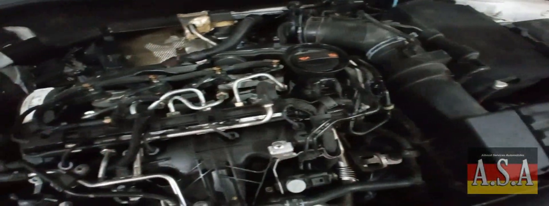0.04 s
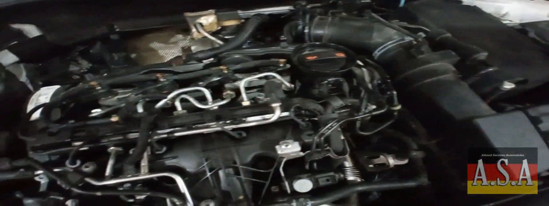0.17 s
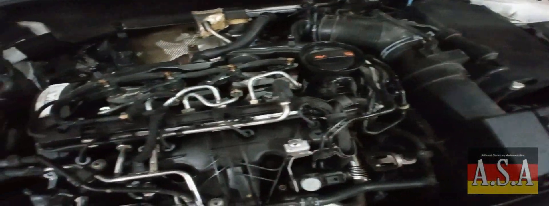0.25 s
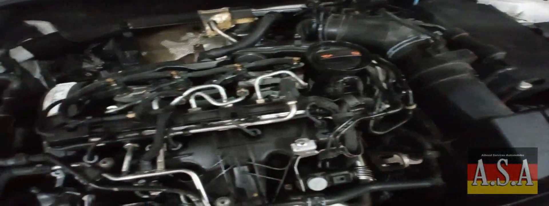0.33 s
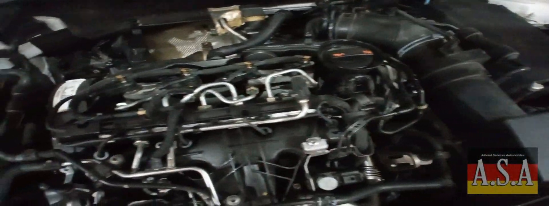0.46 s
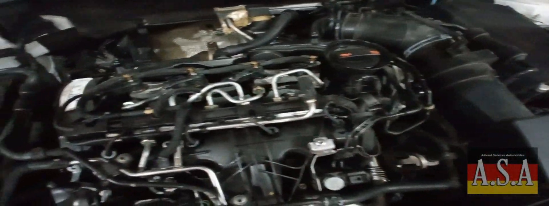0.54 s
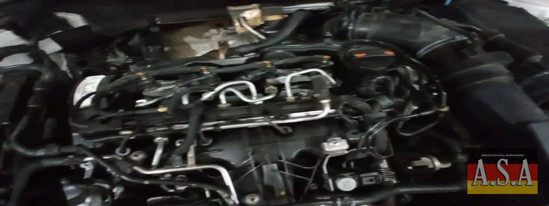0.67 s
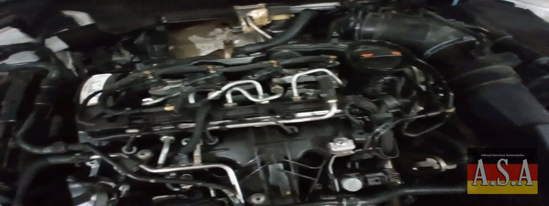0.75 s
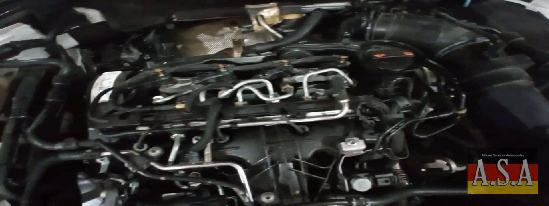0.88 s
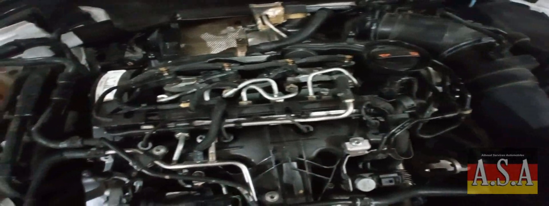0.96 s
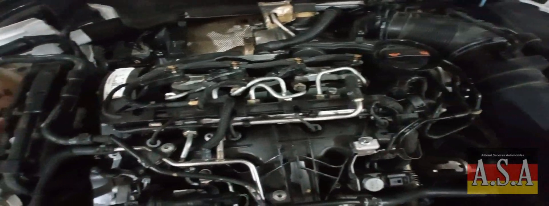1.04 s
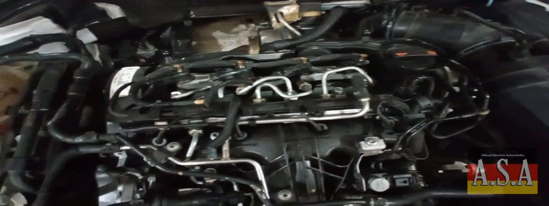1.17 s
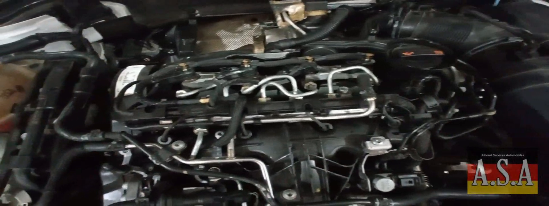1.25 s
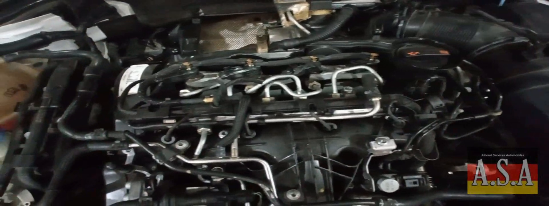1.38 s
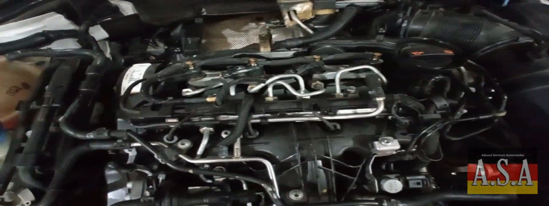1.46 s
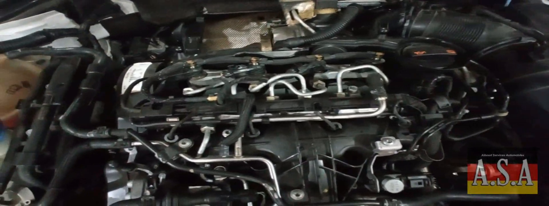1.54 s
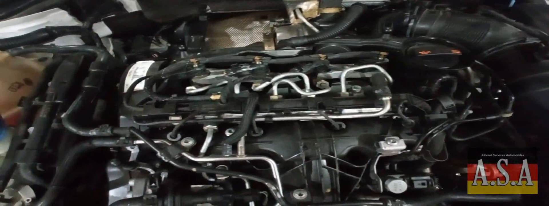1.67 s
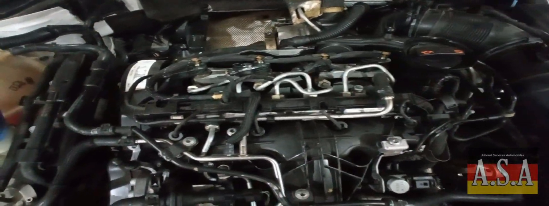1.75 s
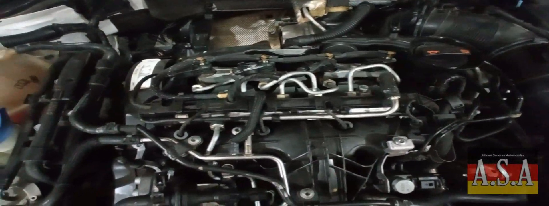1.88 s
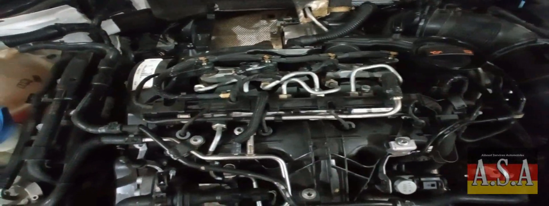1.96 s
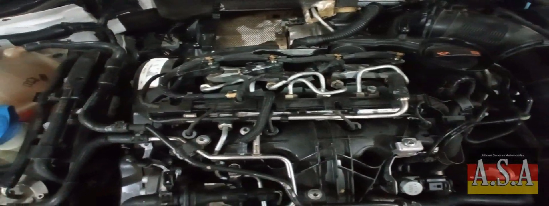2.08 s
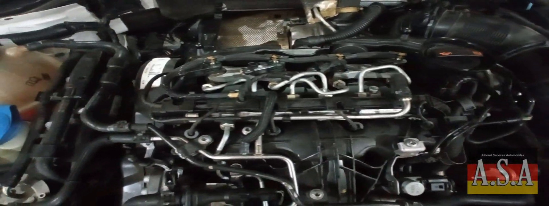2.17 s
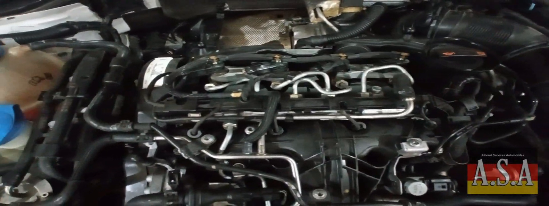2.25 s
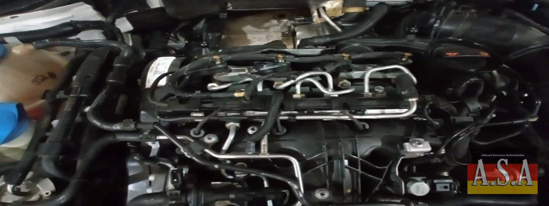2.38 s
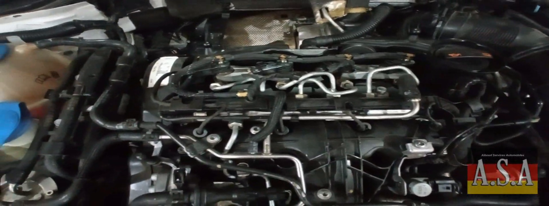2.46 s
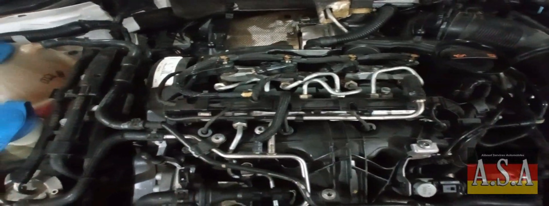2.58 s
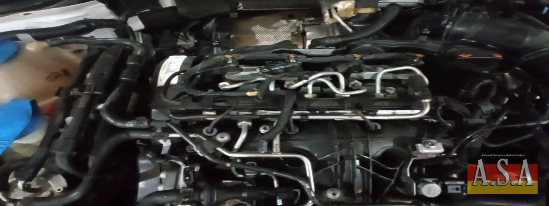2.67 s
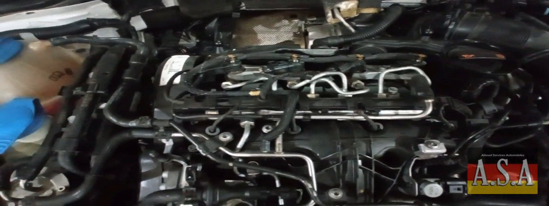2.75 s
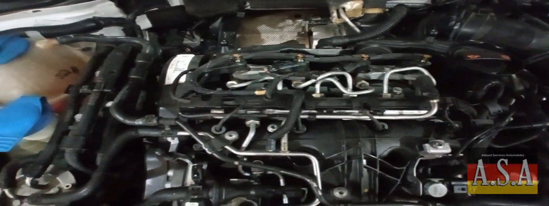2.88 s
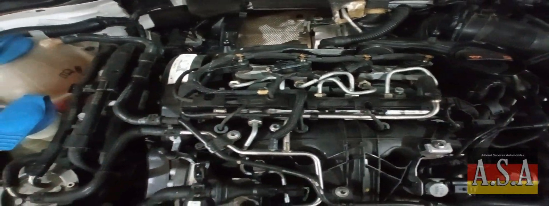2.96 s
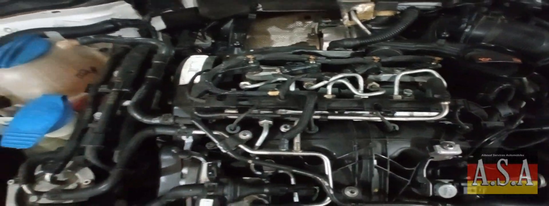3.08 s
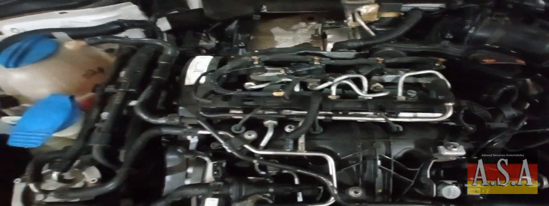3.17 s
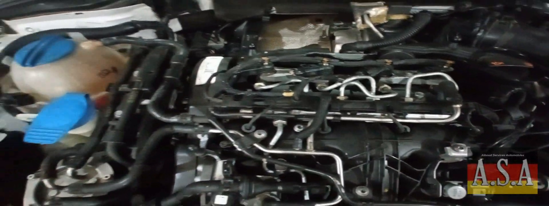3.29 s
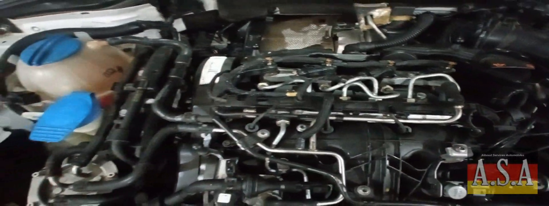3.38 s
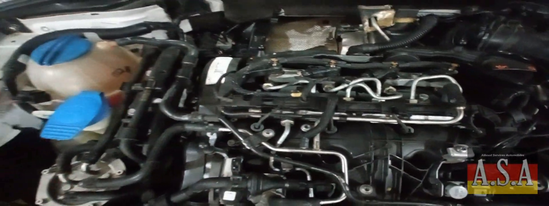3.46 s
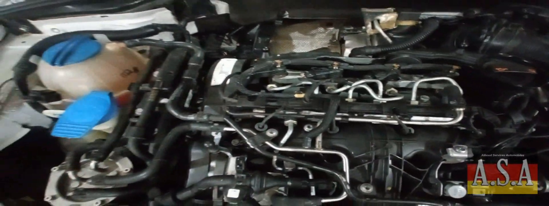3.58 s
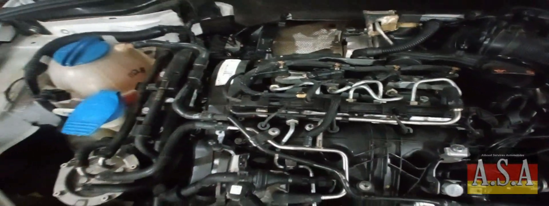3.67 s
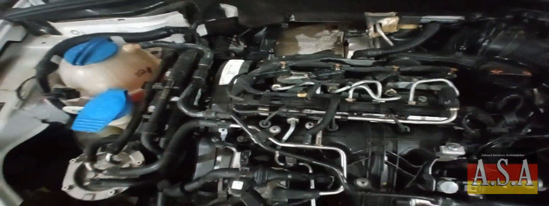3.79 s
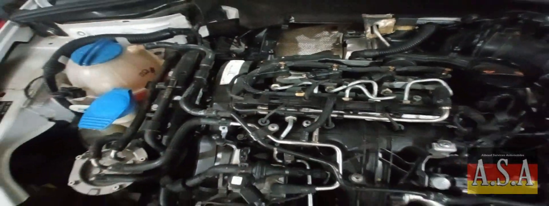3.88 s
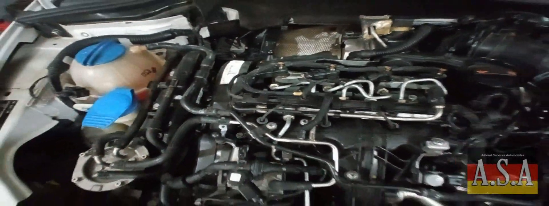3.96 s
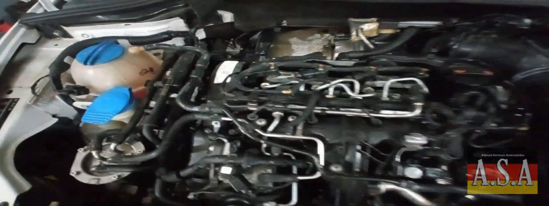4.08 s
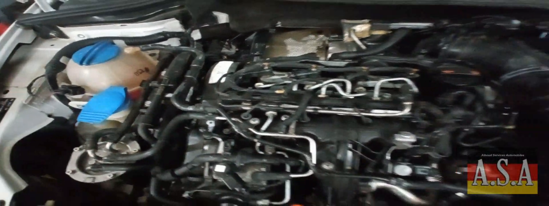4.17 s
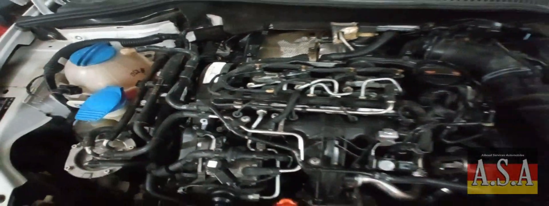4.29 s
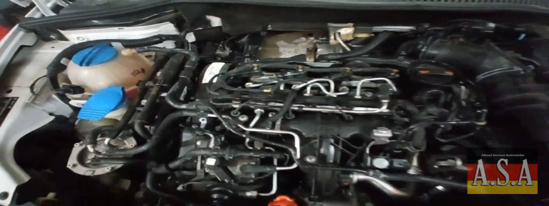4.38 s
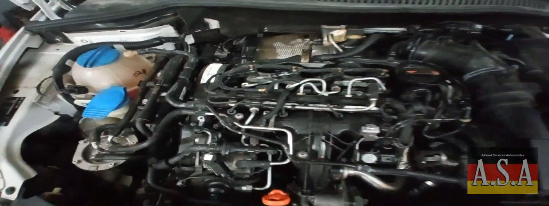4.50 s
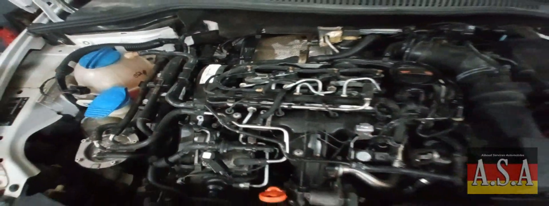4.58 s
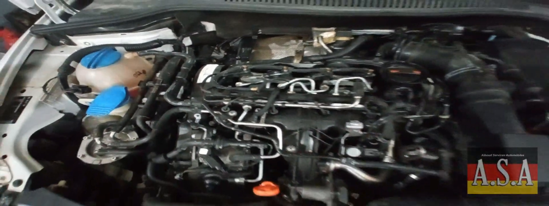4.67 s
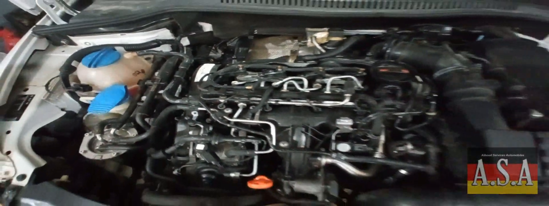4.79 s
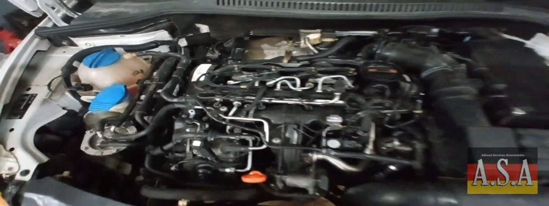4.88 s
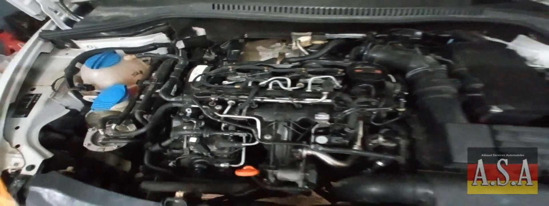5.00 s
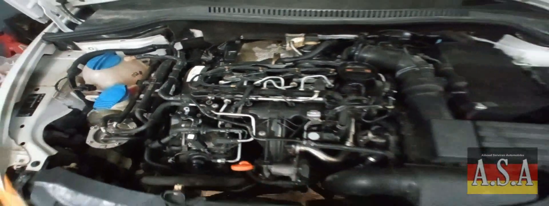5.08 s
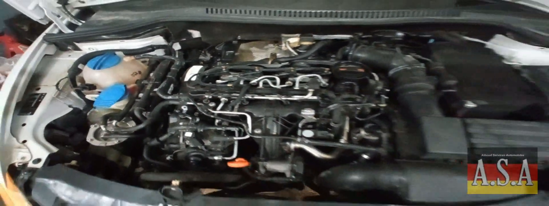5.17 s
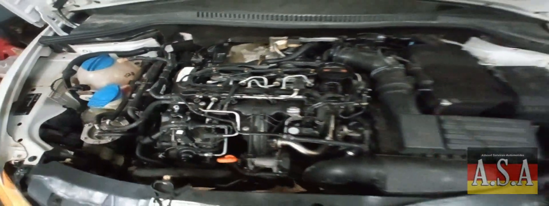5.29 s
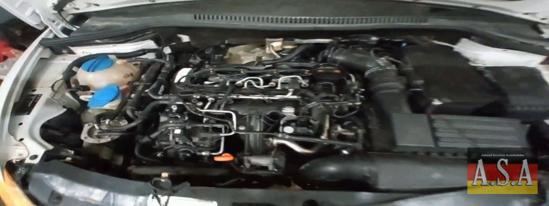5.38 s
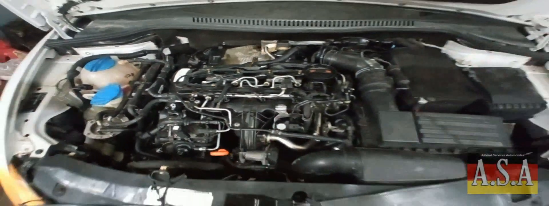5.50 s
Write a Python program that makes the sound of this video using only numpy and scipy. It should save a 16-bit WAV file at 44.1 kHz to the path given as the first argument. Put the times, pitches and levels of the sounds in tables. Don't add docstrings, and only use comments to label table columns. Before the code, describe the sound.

A four-cylinder diesel engine idles steadily with hard metallic clatter and rushing fan noise, then fades away as the microphone backs off.

```python
import sys
import numpy as np
from scipy import signal
from scipy.fft import rfft, irfft, next_fast_len
from scipy.io import wavfile
from scipy.ndimage import uniform_filter1d

SR = 44100
rng = np.random.default_rng(int(sys.argv[2]) if len(sys.argv) > 2 else 0)


def persist_wave(psi):
    counts = np.round(np.clip(psi, -1, 1) * 32767).astype(np.int16)
    wavfile.write(sys.argv[1], SR, np.atleast_2d(counts).T)


def amplitude_ratio(level_db):
    exponent = np.asarray(level_db, float) / 20
    return 10 ** exponent


N = 244299
T = np.arange(N) / SR
CYCLES_PER_S, FIRST_CYCLE_S = 6.502, .686
CYCLE_SAMPLES = int(SR / CYCLES_PER_S) + 40


def cycle_starts():
    swing_ms, period_s, latest_s = .25, 2.1, 2.2
    steady_s = FIRST_CYCLE_S + np.arange(-6, 33) / CYCLES_PER_S
    lag_ms = swing_ms * np.cos(2 * np.pi * (steady_s - latest_s) / period_s)
    return np.round((steady_s + lag_ms / 1000) * SR).astype(int)


def grit(repeat):
    repeat_below_hz, drift_s = 6500, 2.4
    starts, n = cycle_starts(), np.arange(N)
    place = n - starts[np.searchsorted(starts, n, "right") - 1]
    turn = np.pi / 2 * T / drift_s
    pattern = rng.standard_normal((2, CYCLE_SAMPLES))[:, place]
    same = np.cos(turn) * pattern[0] + np.sin(turn) * pattern[1]
    fresh = rng.standard_normal(N)
    size = next_fast_len(N)
    hz = np.fft.rfftfreq(size, 1 / SR)
    share = np.clip(repeat, 0, 1) / np.sqrt(1 + (hz / repeat_below_hz) ** 4)
    spectrum = share * rfft(same, size) + np.sqrt(1 - share ** 2) * rfft(fresh, size)
    return irfft(spectrum, size)[:N]


# f/Hz, width/Hz, level/dB
METAL_PEAKS = [(596, 110, 2), (1450, 71, 0.5), (2246, 76, 5), (2630, 170, 1), (3350, 220, 4),
               (4110, 550, 3.5), (5300, 110, 1), (5990, 140, 3), (6570, 115, 6.5), (7490, 130, 3),
               (9120, 360, 2.5), (10200, 300, 2), (11700, 200, 6), (15500, 330, 3)]


def coloured(x, outline):
    hz = np.abs(np.fft.fftfreq(8192, 1 / SR))
    outline_hz, outline_db = np.transpose(outline)
    db = np.interp(np.log(hz + 1), np.log(outline_hz), outline_db)
    for at, width, peak_db in METAL_PEAKS:
        db = db + peak_db / (1 + (2 * (hz - at) / width) ** 2)
    log_gain = np.log(amplitude_ratio(db))
    phase = -signal.hilbert(log_gain).imag
    taps = np.fft.ifft(np.exp(log_gain + 1j * phase)).real[:2048]
    return signal.oaconvolve(x, taps / np.linalg.norm(taps))[:N]


def each_cycle(shape, ms, db, jitter_ms, spread_db):
    starts, pad = cycle_starts(), 2 * SR
    slip, strength = rng.standard_normal((2, len(starts)))
    offset = np.round((ms + jitter_ms * slip) * SR / 1000).astype(int)
    at = starts + offset - len(shape) // 2 + pad
    gain = amplitude_ratio(db + spread_db * strength)
    out = np.zeros(N + 2 * pad)
    np.add.at(out, at[:, None] + np.arange(len(shape)), gain[:, None] * shape)
    return out[pad:pad + N]


def orders(table, ms):
    starts = cycle_starts()
    turns = np.interp(np.arange(N), starts, np.arange(len(starts))) - ms / 1000 * CYCLES_PER_S
    return sum(amplitude_ratio(db) * np.cos(2 * np.pi * order * turns) for order, db in table)


STAGES_S = [.8, 2.3, 4.4]


def rings(parts, lean, jitter_ms, spread_db):
    ms = np.arange(-1500, 1501) * 1000 / SR
    out = np.zeros(N)
    for hz, half_ms, early_db, late_db, strikes in parts:
        swell = np.exp(-.5 * (ms / (half_ms * (1 + lean * np.sign(ms)))) ** 2)
        tone = swell * np.cos(2 * np.pi * hz * ms / 1000)
        drift_db = np.interp(cycle_starts() / SR, STAGES_S, [early_db, 0, late_db])
        for at, db in strikes:
            out += each_cycle(tone, at, db + drift_db, jitter_ms, spread_db)
    return out


def clatter(strikes, colour, repeat, grain_db, jitter_ms, spread_db):
    ms = np.arange(-2600, 2601) * 1000 / SR
    power = np.zeros(N)
    for at, db, plateau_ms, t60_ms in strikes:
        tail = amplitude_ratio(-120 * np.maximum(ms - plateau_ms, 0) / t60_ms)
        burst = np.clip(ms / 0.39, 0, 1) * tail
        power += each_cycle(burst, at, 2 * db, jitter_ms, 2 * spread_db)
    grain = uniform_filter1d(grit(repeat=.95), size=30) * np.sqrt(30)
    return coloured(np.sqrt(power) * amplitude_ratio(grain_db * grain) * grit(repeat), colour)


# f/Hz, level/dB
RUSH_COLOUR = [(40, -54), (100, -10), (300, -3), (600, 1.5), (1400, 0.5), (2400, -6.5), (4200, -6),
               (6500, -10.5), (8000, -18), (9500, -16.5), (12000, -30), (13800, -32), (14800, -24),
               (16500, -53)]


def fan_and_belts():
    return amplitude_ratio(-6.5) * coloured(grit(repeat=.65), RUSH_COLOUR)


# multiple of the cycle rate, level/dB
GEAR_ORDERS = [(48, -20.5), (92, -18.5), (96, -14.5)]


def gear_hum():
    return orders(GEAR_ORDERS, ms=29.46)


# (t/ms,
# level/dB)
BOOMS = [(89, 7.8, -1.5, -1, [(37.8, -18.5), (135, -20)]), (127, 6.4, -.6, -1.5, [(12.5, -25),
         (71.6, -16)]), (141, 8.4, 1, .3, [(42.4, -23.5), (146.6, -21)]),
         (197.4, 8.3, 2, 2.5, [(27.76, -12), (65.96, -8.5), (105.6, -12.5), (143.2, -18.5)]),
         (342, 2.77, .4, -1, [(49.63, -11.5), (60.74, -19.5), (85.1, -6.5), (109.6, -10)]),
         (349.6, 7.5, 3, -1.2, [(5.82, -14.5), (98.6, -24.5), (132.1, -13.5)]),
         (455, 3.46, 0.8, .1, [(33.9, -20), (56.44, -15.5), (68.13, -7.5), (138.2, -4.5)]),
         (564.5, 6.1, 2, -2.5, [(50.15, -6.5), (90.2, -11), (118.3, -10.5), (149.5, -21)]),
          (601.5, 8.9, -11, -1.5, [(67.8, -9)]), (630, 2.8, -0.8, 2, [(9.43, -7), (23.6, -7)]),
          (667, 9.5, 1, 4.5, [(65.2, -12)]), (792, 1.95, -5.5, -3, [(16.23, -7.5), (50.6, -1), (91, 0.3),
          (128, 1.5)]), (860, 1.86, 0, -1.5, [(68, -11.5), (79.2, -4.5), (116.7, -10)]),
          (801, 9.3, -0.5, -1.5, [(4.9, -11.5), (34.27, -15.5), (142.5, -23.5)]),
          (992, 2.2, 4, -11, [(36.9, -11.5), (50.4, -9)]), (1122, 2.8, -1.5, 4, [(16.9, -16), (87.3, -8),
          (132, -12)]), (1150, 5.5, 3.5, 0, [(53.8, -14), (75.9, -11), (113.4, -14)]),
          (1380, 3.4, 1.3, 0.5, [(14.43, -8), (51.6, -7.5), (93, -5)])]


def pipes_and_covers():
    return rings(BOOMS, lean=0, jitter_ms=.04, spread_db=.8)


# (t/ms, level/dB)
PINGS = [(2590, 1.8, -5, 10, [(27, -12), (45.7, -19.5), (65, -17), (103.5, -10.5), (141.3, -10)]),
         (2705, 2.13, -8.5, -4, [(11.67, -1), (51.4, 2), (62.6, -0.5), (87.4, 4.5), (141.7, -20)]),
         (2810, 1.2, -9, -14, [(23, -13), (99.4, 1)]), (3130, 1.45, -2.5, -3, [(5, 2.5), (125.4, -8),
         (127.5, -8)]), (3327, 2.6, 13.5, 7, [(9.33, -7.5), (85.7, -10)]),
         (3455, 2.1, -0.5, -1, [(48.7, 2.6)]), (3420, 1.9, -4, 1, [(54, .9), (123, -1.2)]),
         (3730, 2.6, 0, -7, [(3.7, -1.2)]), (4200, 1.32, -9, -1, [(23.07, 3.5), (62, 5), (100, 5),
         (113, -12), (138.5, 6)]), (4365, 2.1, 11.5, -3, [(22, -10), (61, -13), (73.5, -15), (89.7, -9),
         (99.5, -12.5), (137.5, -11.5)]),
         (5940, 1.9, -3, -15, [(23, -4), (62, -2.5), (100, 0), (138.5, -2)]),
           (5070, .8, -8, -2.5, [(5.5, 2.5)]), (7440, 1.6, 0, -0.5, [(23, -13), (62, -9.5), (100, -14),
           (138.5, -9.5)])]


def block_and_needles():
    return amplitude_ratio(-1.5) * rings(PINGS, lean=.3, jitter_ms=.1, spread_db=1.0)


# t/ms, level/dB, plateau t/ms, t60/ms
SPURTS = [(3, -23, 8, 80), (44.2, -17, 1.5, 65), (82.8, -19, 1.5, 70), (120.3, -21, 6, 60),
          (60.5, -30, 2, 40)]
# f/Hz, level/dB
SPURT_COLOUR = [(12000, -42), (13900, -18), (14500, 4), (15800, -2), (16500, -11)]


def injector_spurts():
    return clatter(SPURTS, SPURT_COLOUR, repeat=.3, grain_db=3.0, jitter_ms=.2, spread_db=2.5)


# t/ms, level/dB, plateau t/ms, t60/ms
TICKS = [(21, -4, 3.1, 27), (60.7, -4, 2, 32), (96.9, -3.5, 4.7, 22), (137.1, -3.5, 2.2, 24),
         (33.8, -16, 2.4, 54), (73, -4, 1.5, 17), (111.7, -11.5, 2, 32), (148.7, -10, 1.5, 27),
         (15.5, -4, 2.7, 17)]
# f/Hz, level/dB
TICK_COLOUR = [(1500, -35), (2600, 0.5), (4300, 0), (5800, -1), (7400, -2.5), (8100, -16), (9100, -8),
               (11000, -24.5), (13800, -20), (16500, -11)]


def injector_and_valve_ticks():
    return clatter(TICKS, TICK_COLOUR, repeat=.85, grain_db=1.5, jitter_ms=.15, spread_db=1.0)


# t/ms, level/dB, plateau t/ms, t60/ms
THUDS = [(10.44, -2.5, 5.1, 49), (47.4, -3, 7.1, 51), (87.2, -5.5, 5.4, 30), (124.8, -3, 4.6, 26),
         (19.2, -9.5, 0.89, 14)]
# f/Hz, level/dB
THUD_COLOUR = [(500, -24.5), (900, -2), (1400, -2.5), (1900, 0), (2300, -7.5), (3000, -9.5), (5000, -30)]


def block_thuds():
    return clatter(THUDS, THUD_COLOUR, repeat=.75, grain_db=1.0, jitter_ms=.15, spread_db=.8)


# t/ms, level/dB, plateau t/ms, t60/ms
KNOCKS = [(3.82, 2.5, 4.4, 45), (44.64, -1, 4.2, 42), (83.3, -0.5, 4.4, 43), (121.5, -2, 5.4, 51),
          (8.45, -9, 2, 43), (48, -1.5, 3.2, 38), (87, -3.5, 1.9, 35), (128.3, -3, 3.2, 29)]
# f/Hz, level/dB
KNOCK_COLOUR = [(1200, -17.5), (2300, -14), (3000, -1.5), (4300, 1), (5200, 1), (6600, -2.5), (8000, -15),
                (9600, -10), (11500, -21.5), (13600, -20.5), (14600, -27), (16500, -16)]


def combustion_knocks():
    return clatter(KNOCKS, KNOCK_COLOUR, repeat=.8, grain_db=1.8, jitter_ms=.15, spread_db=.7)


CLATTER_DB = [-0.5, -0.5, -2]


def all_clatter():
    metal = injector_spurts() + injector_and_valve_ticks() + block_thuds() + combustion_knocks()
    return amplitude_ratio(np.interp(T, STAGES_S, CLATTER_DB)) * metal


# multiple of the cycle rate, level/dB
EXHAUST_ORDERS = [(8, -24), (12, -18.5), (16, -31), (20, -20.5), (24, -27.5)]


def exhaust():
    return orders(EXHAUST_ORDERS, ms=27.8)


# t/s, level/dB
FADE = [(0, -31), (1.2, -30.5), (2.9, -30.2), (3.3, -34.5), (3.9, -39), (4.2, -40), (4.8, -45),
        (5.3, -50.5), (5.54, -54.5)]


def backing_away(engine):
    knee_db, share_kept = -41, 0.29
    level_db = np.interp(T, *np.transpose(FADE))
    bass = signal.sosfiltfilt(signal.butter(6, 235, fs=SR, output="sos"), engine)
    bass_lift = amplitude_ratio(share_kept * np.maximum(knee_db - level_db, 0))
    return amplitude_ratio(level_db) * (engine + (bass_lift - 1) * bass)


def scene():
    engine = fan_and_belts() + gear_hum()
    engine += pipes_and_covers() + block_and_needles()
    engine += all_clatter() + exhaust()
    return backing_away(engine)[None]


def band_limit(x):
    return signal.sosfilt(signal.butter(12, 16850, fs=SR, output="sos"), x)


def record(dry):
    thin = signal.sosfilt(signal.butter(3, 40, "high", fs=SR, output="sos"), dry)
    top_cut = signal.firwin(401, 15930, window=("kaiser", 10), fs=SR)
    mix = signal.oaconvolve(thin, top_cut[None], "same")
    return band_limit(mix)


dry = scene()
out = record(dry)
persist_wave(out)
```